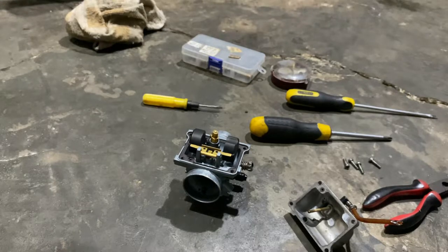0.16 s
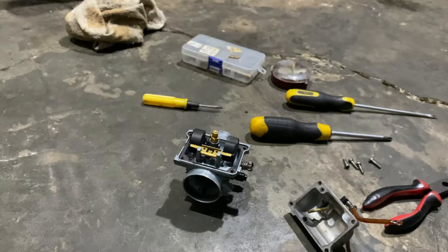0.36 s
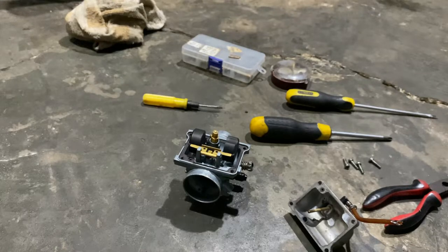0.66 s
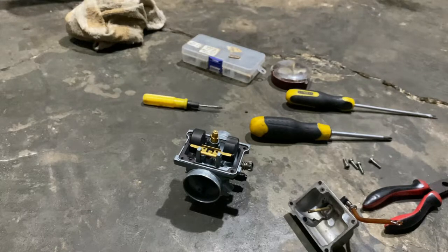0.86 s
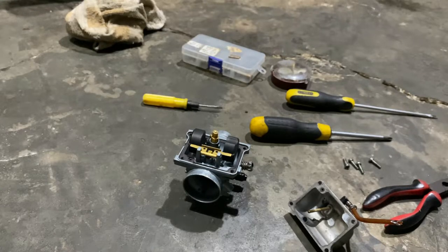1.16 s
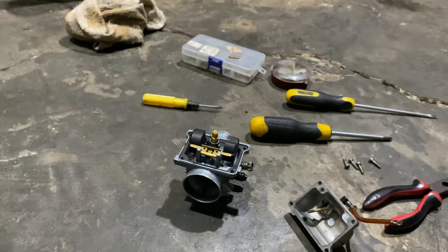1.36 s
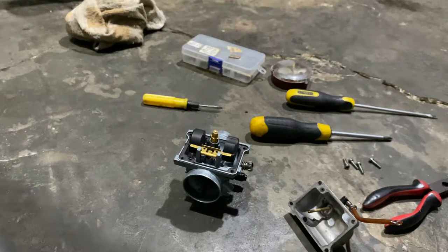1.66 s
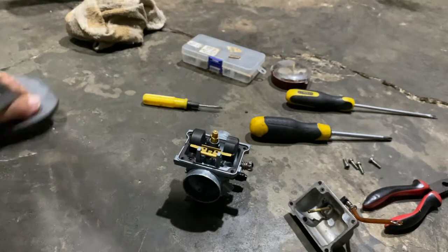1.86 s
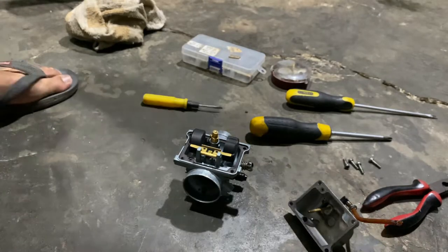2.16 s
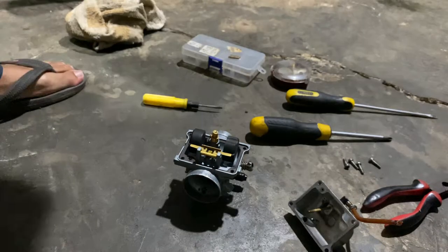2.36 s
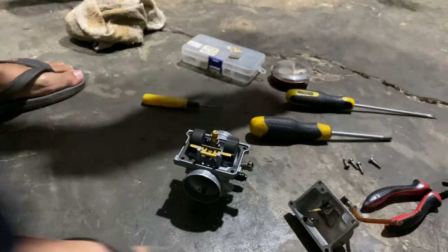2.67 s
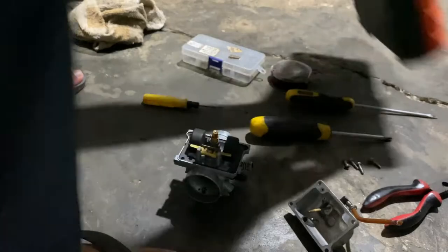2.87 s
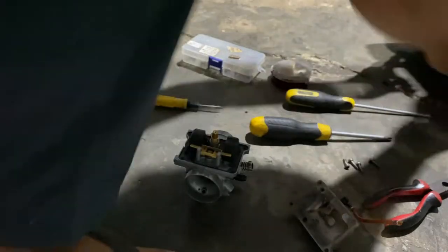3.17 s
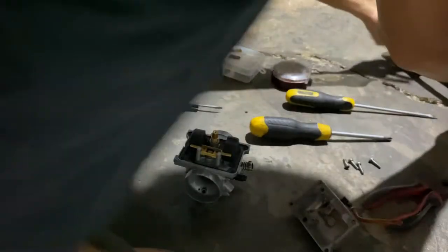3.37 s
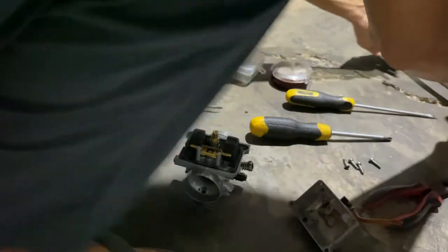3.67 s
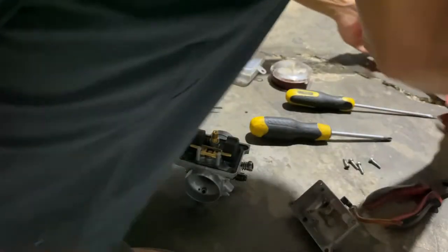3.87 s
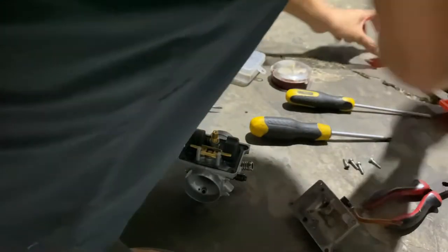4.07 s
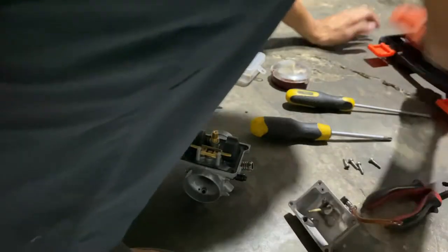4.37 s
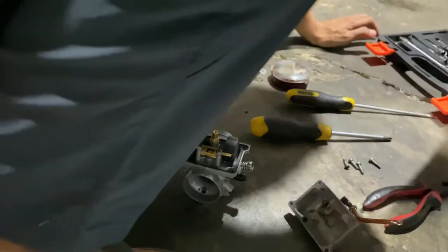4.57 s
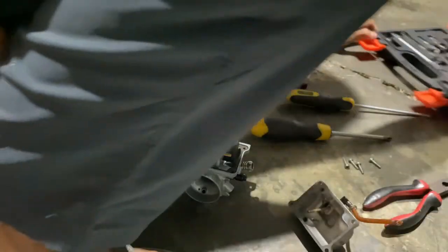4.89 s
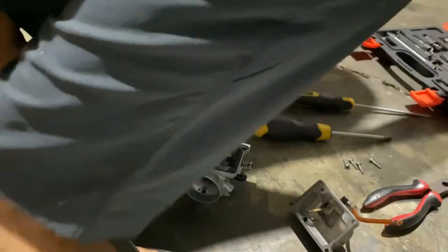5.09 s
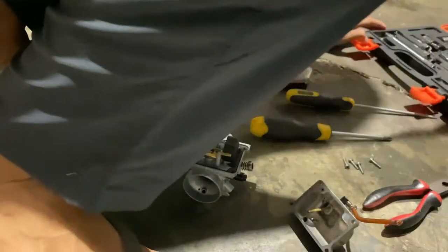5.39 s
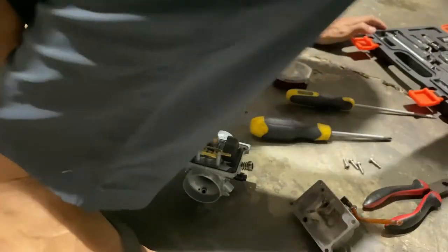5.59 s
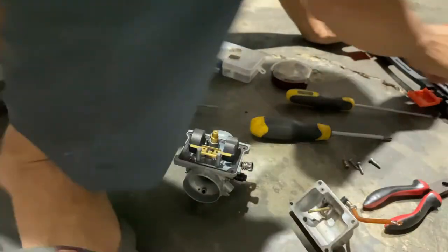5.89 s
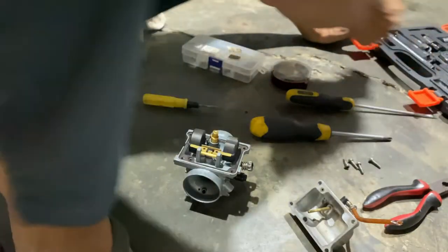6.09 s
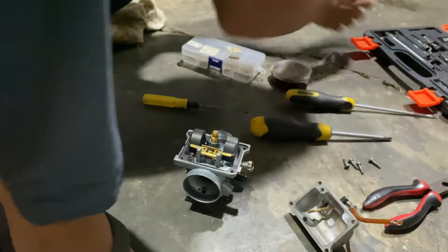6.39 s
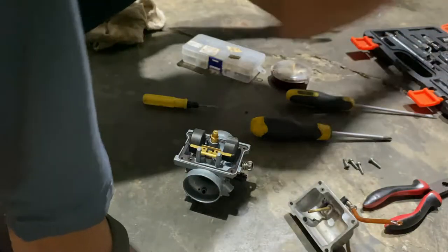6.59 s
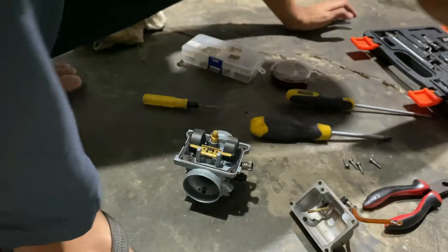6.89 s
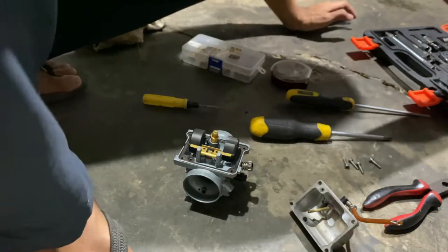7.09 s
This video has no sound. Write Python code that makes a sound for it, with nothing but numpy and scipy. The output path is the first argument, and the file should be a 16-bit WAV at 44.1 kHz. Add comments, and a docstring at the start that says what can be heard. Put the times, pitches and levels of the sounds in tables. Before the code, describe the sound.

Close up in a small, hard workshop with a low, wavering hum, clothes rustle and dry ticks crack. Sandals slap the concrete and a loaded plastic tool case lands with a boom and a rattle of tools. It bumps and scrapes over grit, a latch snaps, lighter knocks follow, then a second hard cluster of clacks and scrapes. It ends in rustling cloth, a tiny sole squeak and hum.

```python
"""In a workshop with a low hum, a loaded plastic tool case lands on a concrete floor, close to the microphone.
Blows are noise bursts with a ringing shell, then a looser rattle; landings, lid, latch and panels ring as modes.
Dragging is noise shaped by random slips, with crushed grit; sandal slaps and steel tools clack as short modes.
Someone moves nearby: cloth rustles as filtered friction, dry ticks crack and a sole squeaks on a sagging note."""
import sys
import numpy as np
from scipy import signal
from scipy.fft import rfft, irfft, next_fast_len
from scipy.io import wavfile
from scipy.ndimage import map_coordinates

SR = 44100
rng = np.random.default_rng(int(sys.argv[2]) if len(sys.argv) > 2 else 0)


def store_wav(level_fs):
    """Save 16-bit WAV to argv[1]."""
    pcm = np.round(np.clip(np.atleast_2d(level_fs), -1, 1) * 32767)
    wavfile.write(sys.argv[1], SR, pcm.T.astype(np.int16))


N = 319725
TOP_HZ = 16000  # upper band limit of the microphone
TIME = np.arange(N) / SR  # seconds through the scene
RING = np.arange(SR // 2) / SR  # seconds through one short sound

# Ringing modes of the case's shell. Each row: frequency in Hz, relative level in dB, t60 in seconds.
SHELL_MODES = [(263.6, -27.5, 0.25), (373, -29.5, 0.12), (471, -25, 0.17), (567.4, -20, 0.073),
               (703.6, -30, 0.1), (1014, -29, 0.27), (1316, -28.5, 0.13), (1476, -25.5, 0.085),
               (1740, -33, 0.085), (1900, -20, 0.1), (2245, -29.5, 0.16), (2370, -27.5, 0.08),
               (2690, -22, 0.17)]
# Colour of the struck or rubbed plastic. Each row: frequency in Hz, relative level in dB per Hz.
PLASTIC_COLOUR = [(40, -31), (90, -27), (160, 3.5), (230, -11.5), (450, -3), (750, 2.5), (1100, -5),
                  (2200, -10), (4500, -17), (6500, -19.5), (8500, -23.5), (11500, -27.5), (15500, -42)]


def amp(db):
    """Decibels to gain."""
    return 10 ** (np.asarray(db) / 20)


def unit(x):
    """Scale to rms 1."""
    return x / np.sqrt(np.mean(x ** 2) + 1e-20)


def fade(t, t60):
    """Exponential decay, 60 dB down at t60."""
    return np.exp(-np.log(1000) * t / t60)


def along(points, hz):
    """Read a curve of (Hz, value) points on a log frequency axis."""
    f, v = np.transpose(points)
    return np.interp(np.log(hz + 1), np.log(f + 1), v)


def wobble(rate):
    """A smooth random curve, rate knots a second."""
    knots = rng.standard_normal(int(N * rate / SR) + 4)
    return map_coordinates(knots, [TIME * rate])


def add(track, s, sound):
    """Mix a sound into the track from time s."""
    start = round(s * SR)
    part = sound[..., :N - start]
    track[:, start:start + part.shape[-1]] += part


def colour(x, points, band=(20, TOP_HZ), tilt=((1000, 0),)):
    """Causal filter; before the tilt, white noise of rms 1 comes out with rms 1 inside the band."""
    size = 2 * next_fast_len(x.shape[-1] // 2 + 4096)
    hz = np.fft.rfftfreq(size, 1 / SR)
    gain = amp(along(points, hz))
    in_band = (hz > band[0]) * (hz < band[1])
    gain = gain / np.sqrt(np.mean(gain ** 2 * in_band))
    gain = gain * amp(along(tilt, hz))
    # folding the cepstrum onto positive time gives the filter minimum phase
    cepstrum = irfft(np.log(gain)) * (1 + np.sign(size // 2 - np.arange(size)))
    cepstrum[0] /= 2
    response = np.exp(rfft(cepstrum))
    return irfft(rfft(x, size) * response, size)[..., :x.shape[-1]]


def ring(modes, t, scatter_db, detune=0):
    """Damped modes along two paths, each at a new strength and phase; a changing grip can shift their pitch."""
    hz, db, t60 = np.transpose(modes)[:, :, None]
    hz = hz * (1 + detune * rng.standard_normal(hz.shape))
    strength = amp(db + scatter_db * rng.standard_normal((2, len(modes), 1)))
    phase = 2 * np.pi * rng.random((2, len(modes), 1))
    return np.sum(strength * np.sin(2 * np.pi * hz * t + phase) * fade(t, t60), axis=1)


def push(modes, t, rise):
    """Damped modes set swinging from rest."""
    swing = sum(amp(db) * np.sin(2 * np.pi * hz * t) * fade(t, t60) for hz, db, t60 in modes)
    return swing * (1 - np.exp(-t / rise))


def friction(rate, spread_db, life, smooth):
    """Tiny slips of uneven size at random moments, over a smooth share of rubbing."""
    struck = rng.random(N) < rate / SR
    slips = struck * amp(spread_db * rng.standard_normal(N)) ** 2
    power = np.abs(signal.fftconvolve(slips, fade(RING, life) ** 2)[:N])
    envelope = np.sqrt(power / power.mean() + smooth)
    return unit(envelope * rng.standard_normal((2, N)))


def stroke(s, length, swell_db, attack, release):
    """A movement speeds up over a share of its length, swells or eases while it lasts, then dies away."""
    gone = np.clip((TIME - s) / length, 0, 1)
    speed = np.sin(np.pi / 2 * np.minimum(gone / attack, 1)) ** 2
    stopping = fade(np.maximum(TIME - s - length, 0), release)
    return speed * amp(swell_db * (gone - .5)) * stopping


def hum(waver_db=6.5, drift=0.74):
    """A low machine rumble of coloured noise with a few tones wavering in level and phase."""
    # Colour of the rumble. Each row: frequency in Hz, relative level in dB per Hz.
    rumble_colour = [(20, -32), (35, -5), (48, -5.5), (75, 1), (110, 5.5), (160, -4.5), (280, -18),
                     (620, -17.5), (1100, -30), (2000, -37.5), (4500, -46.5), (11000, -55.5), (15500, -69)]
    # Strength of the rumble. Each row: time in seconds, level in dB.
    rumble_levels = [(0, -38.5), (1, -41.5), (2, -44), (4, -43.5), (6, -44.5), (7.25, -43)]
    # Tones in the hum. Each row: frequency in Hz, level in dB about which it wavers.
    drone_tones = [(57, -53.5), (100, -64), (108, -57), (124, -53)]
    seconds, level_db = np.transpose(rumble_levels)
    strength = amp(np.interp(TIME, seconds, level_db))
    out = strength * colour(rng.standard_normal((2, N)), rumble_colour)
    for hz, db in drone_tones:
        level = amp(db + waver_db * wobble(3.03))
        out = out + level * np.sin(2 * np.pi * hz * TIME + drift * wobble(2.7))
    return out


def workshop(x):
    """The room's answer: a tail of noise, 10 ms behind the source, that dies sooner in the treble."""
    # Decay of the room. Each row: frequency in Hz, t60 in seconds.
    room_decay = [(100, 0.38), (500, 0.36), (2500, 0.28), (6000, 0.21), (14000, 0.15)]
    hz, t, z = signal.stft(rng.standard_normal((2, SR)), SR, nperseg=256)
    decayed = z * fade(t, along(room_decay, hz)[:, None])
    tail = signal.istft(decayed, SR, nperseg=256)[1]
    tail = np.pad(tail, ((0, 0), (SR // 100, 0)))
    return signal.fftconvolve(x, tail / np.linalg.norm(tail[0]), axes=1)[:, :N]


def clothes(level_db=-1, fold_hz=2900, stir_db=-66.5, stir_waver_db=3, release_s=0.18):
    """Fabric brushes on fabric with each movement; soft folds sound lower than taut cloth."""
    # Colour of taut cloth. Each row: frequency in Hz, relative level in dB per Hz.
    cloth_colour = [(300, -25), (1200, -9.5), (2000, -5.5), (3000, -0.5), (4500, 2), (6500, -3.5),
                    (8500, -7), (11000, -7.5), (13000, -16.5), (15500, -21)]
    # Brushes of cloth on cloth. Each row: start in seconds, length in seconds, relative rustle level in dB,
    # swell from start to end in dB, share of the length spent speeding up (0-1), share of soft folds (0-1).
    brushes = [(0.026, .2, -57.5, 2.5, 0.19, 0), (0.306, 0.056, -48.5, -12.5, 0.28, .05),
               (0.487, 0.22, -45, 9, 0.094, 0.1), (0.792, 0.18, -54.5, 8, 0.076, 0.5),
               (1.092, 0.15, -56, -16, 0.37, .25), (1.278, 0.052, -57.5, 0, 0.44, 0.4),
               (1.368, 0.021, -55, 14, 1, 0), (2.756, 0.92, -59, -1, 0.042, .05),
               (4.584, 0.31, -69, 0, 0.15, 0.9), (5.098, 0.293, -55.5, 9, 0.39, .5),
               (5.776, 0.27, -43, -22, 0.68, 0.6), (6.176, 0.037, -59, 6, .6, .55),
               (6.33, 0.07, -60, 0, 0.59, 0.6), (6.444, 0.081, -47, -9, 0.6, 0.7)]
    tight = amp(stir_db + stir_waver_db * wobble(3.82))  # cloth never lies quite still
    loose = 0
    for s, length, db, swell_db, attack, soft in brushes:
        brush = amp(db) * stroke(s, length, swell_db, attack, release_s)
        tight = tight + (1 - soft) * brush
        loose = loose + soft * brush
    fibres = friction(rate=900, spread_db=3, life=.006, smooth=1.2)
    taut = colour(fibres, cloth_colour)
    folded = colour(fibres, cloth_colour, tilt=[(1000, -1), (fold_hz, 4), (5000, -4), (11000, -1)])
    return amp(level_db) * (tight * taut + loose * folded)


def squeak(sag_hz_per_s=5000, life=0.014, rough=0.9):
    """Rubber of a sole catches on the concrete in a rough note that sags as it slows."""
    # The one squeak: start in seconds, starting frequency in Hz, level in dB.
    sole_squeak = (6.51, 2000, -55)
    s, hz, db = sole_squeak
    t = RING[:SR // 6]
    out = np.zeros((2, N))
    phase = 2 * np.pi * np.cumsum(hz - sag_hz_per_s * t) / SR + rough * wobble(400)[:len(t)]
    swell = t / life * np.exp(1 - t / life)  # peaks at life, in seconds
    add(out, s, amp(db) * swell * np.sin(phase))
    return out


def ticks(t60=0.025, level_db=2):
    """Short bright cracks of decaying noise with no body."""
    # Small dry ticks. Each row: start in seconds, relative level in dB, snap from 9 kHz up in dB.
    dry_ticks = [(.728, -31.5, 2.5), (.885, -31.5, -3.5), (0.937, -40, -4), (.969, -41.5, -16),
                 (1.951, -30.5, -23), (2.773, -28.5, -4), (3.472, -35, -8), (3.509, -38.5, -8),
                 (3.578, -29.5, -5.5), (3.729, -40.5, 7), (4.355, -50, 6.5), (4.924, -42, 8),
                 (6.099, -57, 13), (6.669, -59, 5), (6.694, -57, -6)]
    # Colour of a tick. Each row: frequency in Hz, relative level in dB per Hz.
    tick_colour = [(200, -10), (900, -0.5), (1500, -0.5), (3000, 1.5), (5000, 2), (8500, -9.5),
                   (12000, -8.5), (15500, -28)]
    out = np.zeros((2, N))
    for s, db, snap_db in dry_ticks:
        crack = rng.standard_normal((2, len(RING))) * fade(RING, t60)
        snapped = colour(crack, tick_colour, (1500, 6000), [(4000, 0), (9000, snap_db)])
        add(out, s, amp(db + level_db) * snapped)
    return out


def grains(rate, centre_hz, spread, cycles, size_db):
    """Grit crushed underneath: brief pings of scattered pitch and size, each dying over a number of cycles."""
    draw = rng.standard_normal((int(rate * N / SR), 2))
    start = rng.integers(0, N, len(draw))[:, None]
    hz = np.clip(centre_hz * np.exp(spread * draw[:, :1]), 800, 14000)
    step = np.arange(SR // 100)
    turns = hz * step / SR
    size = amp(size_db * np.clip(draw[:, 1:], -2, 2))
    pings = size * np.sin(2 * np.pi * turns) * fade(turns, cycles)
    return unit(np.bincount((start + step).ravel(), pings.ravel(), N)[:N])


def sliding(scrape_db=-4.0, hiss_db=-3, crackle_db=2, peak_db=5, width_hz=22):
    """Slips on the concrete shake the shell, while grit crackles and hisses under it."""
    # Shoves of the case over the floor. Each row: start in seconds, length in seconds,
    # relative scrape level in dB, relative grit hiss level in dB, swell from start to end in dB.
    shoves = [(2.24, 0.21, -47.5, -60, -6), (2.318, 0.032, -50, -45.5, 6.5), (2.74, 0.26, -47.5, -97, 14.5),
              (3.092, 0.033, -35, -70, -13), (3.272, 0.069, -31, -46, 6), (3.362, .12, -43.5, -47, -2.5),
              (3.683, 0.12, -49, -63, -7), (3.848, 0.27, -49.5, -79, -21), (4.345, .1, -56, -68, 3.5),
              (4.916, 0.096, -33, -39, 8), (5.183, 0.091, -37.5, -68, 2), (5.37, 0.065, -37.5, -73, 15.5),
              (5.5, 0.09, -27.5, -54.5, 2.5)]
    # Colour of the grit hiss. Each row: frequency in Hz, relative level in dB per Hz.
    grit_colour = [(1000, -44), (3000, -11), (5500, 12.5), (8500, 0), (11000, 2.5), (13000, -9),
                   (15500, -13)]
    scrape, hiss = np.zeros((2, N))
    for s, length, push_db, grit_db, swell_db in shoves:
        shove = stroke(s, length, swell_db, attack=0.22, release=0.13)
        scrape = scrape + amp(push_db) * shove
        hiss = hiss + amp(grit_db) * shove
    slips = friction(rate=300, spread_db=3.5, life=.011, smooth=.2)
    hz = np.geomspace(100, 4000, num=400)
    # the slipping noise is lifted around each mode of the shell
    resonances = sum(peak_db / (1 + ((hz - mode[0]) / width_hz) ** 2) for mode in SHELL_MODES)
    shaken = colour(slips, np.column_stack([hz, resonances]))
    body_tilt = [(150, -5.0), (350, 2), (550, 0.5), (800, 0), (3000, -6.0), (8000, -8)]
    body = colour(shaken, PLASTIC_COLOUR, (400, 1500), body_tilt)
    crackle = np.array([grains(rate=750, centre_hz=3400, spread=.42, cycles=40, size_db=4.5)
                        for path in range(2)])
    rubbed_grit = friction(rate=270, spread_db=5.5, life=0.055, smooth=0.21)
    grit = colour(rubbed_grit, grit_colour, (6500, 12500))
    # the crackle grows with both the pressure and the fine grit
    crunch = amp(crackle_db) * np.sqrt(scrape * hiss) * crackle
    return amp(scrape_db) * scrape * body + amp(hiss_db) * hiss * grit + crunch


def clacks():
    """Sandal slaps and shifting steel tools share a set of short bright modes, roughened by a fast chatter."""
    # Bright clacks: the first three a sandal slapping the floor, the rest steel tools shifting in the case.
    # Each row: start in seconds, relative level in dB.
    bright_clacks = [(1.95, -24.5), (1.956, -30.5), (2.001, -32.5), (2.149, -24.5), (2.175, -26),
                     (2.268, -39), (5.427, -32)]
    # Modes of the clacks. Each row: frequency in Hz, relative level in dB, t60 in seconds.
    clack_modes = [(3496, 0.5, 0.047), (3820, -5, 0.056), (4360, -1.5, 0.039), (4600, 3.5, 0.054),
                   (4900, -2.5, 0.046), (5060, -6, 0.04), (5360, -18, .03), (5770, -2.5, 0.055),
                   (5900, -10, 0.053), (6600, -5.5, 0.04), (7200, -9.5, 0.053), (10400, -30.5, 0.013),
                   (11700, -37, .03)]
    out = np.zeros((2, N))
    for s, db in bright_clacks:
        chatter = .6 + .8 * wobble(700)[:len(RING)]
        add(out, s, amp(db) * chatter * ring(clack_modes, RING, scatter_db=2.0))
    return out


def weight(partner_db=-4, panel_hz=150, panel_t60_s=0.23, panel_damping=0.8):
    """The loaded case booms on landing, lid and latch ring, and panels drum in clusters of close modes."""
    # The weight of the case landing. Each row: start in seconds, relative level in dB.
    landings = [(2.114, -17), (2.22, -26.5)]
    # Bumps that set the hollow lid humming. Each row: start in seconds, relative level in dB.
    lid_bumps = [(1.57, -43), (3.283, -35.5)]
    # The latch springing open. Each row: start in seconds, relative level in dB.
    latch_snaps = [(3.102, -22)]
    # Modes of the loaded case. Each row: frequency in Hz, relative level in dB, t60 in seconds.
    boom_modes = [(57.8, 3.5, 0.88), (84.5, 1.5, 0.62), (47, -8, 0.36)]
    # Modes of the lid. Each row: frequency in Hz, relative level in dB, t60 in seconds.
    lid_modes = [(283, -2, 0.83), (283, -6, 0.88), (332, -6.5, 0.57)]
    # Modes of the latch. Each row: frequency in Hz, relative level in dB, t60 in seconds.
    latch_modes = [(1026, 8.5, 0.056), (1090, 0, 0.1), (1270, -15, 0.05), (2240, 2.5, 0.056),
                   (2415, -3, 0.088), (2640, 2.5, 0.071), (3260, -4, 0.076)]
    # Hollow drumming: the first goes with a sandal slap, the rest are panels flexing.
    # Each row: start in seconds, lowest note of the cluster in Hz, relative level in dB.
    drummings = [(1.958, 700, -20.5), (2.112, 123, -15.5), (2.114, 441, -17.5), (2.155, 675, -5),
                 (2.171, 171.6, -19.5), (2.318, 180.4, -28.5), (2.57, 448, -42), (2.657, 373, -35.5),
                 (2.764, 571, -24), (2.887, 327, -32.5), (3.076, 373, -26), (3.101, 158.5, -36),
                 (3.786, 1630, -37), (3.83, 147, -25), (3.931, 112.6, -26.5), (4.039, 1186, -33),
                 (4.951, 244, -26), (4.987, 371, -22.5), (4.992, 561.5, -16.5), (5.421, 686, -20),
                 (5.504, 154.3, -26), (5.585, 160, -23.5)]
    out = np.zeros((2, N))
    for hits, modes in [(landings, boom_modes), (lid_bumps, lid_modes), (latch_snaps, latch_modes)]:
        for s, db in hits:
            add(out, s, amp(db) * push(modes, np.arange(SR) / SR, rise=0.0017))
    for s, hz, db in drummings:
        # higher notes die sooner
        t60 = panel_t60_s * (panel_hz / hz) ** panel_damping
        second = (hz * 1.09, partner_db, t60 * 1.04)
        third = (hz * 1.22, partner_db + 0.5, t60 * 0.73)
        add(out, s, amp(db) * push([(hz, 0, t60), second, third], RING, rise=1 / hz))
    return out


def plastic(x, bass_db, hard_db, crack_share=0.33):
    """The colour of a blow: hollow spots add bass, hard contacts add crack and snap."""
    crack_db = crack_share * hard_db  # part of the hardness that reaches down to 2-5 kHz
    tilt = [(280, bass_db), (520, 0), (1100, 0), (2200, crack_db), (5000, crack_db), (8000, hard_db)]
    return colour(x, PLASTIC_COLOUR, (400, 1500), tilt)


def knocks(contact=0.85, contact_t60=0.0027, shell_db=-2, fall_rise=0.0049):
    """Each blow is a contact, a dense rattle and a modal ring; a heavier one has a stronger looser rattle after it."""
    # Blows: those at 1.952 and 2.002 s are the body of sandal slaps, the others fall on the case.
    # Each row: start in seconds, relative level in dB, hollow bass in dB, hardness in dB, rise in seconds.
    blows = [(1.563, -40, 24, -1, 0.0063), (1.952, -22.5, 2, -7, 0.0036), (2.002, -26.5, 6.5, -17, 0.0019),
             (2.11, -19, 14, -21, 0.0029), (2.124, -20, 13.5, -8, 0.0027), (2.151, -15.5, 10.5, -6, .002),
             (2.177, -17.5, -4, -11, 0.0047), (2.2, -18, 2, -7.5, 0.0079), (2.267, -38, 13, 1, 0.0033),
             (2.318, -22, 6.5, -22, 0.0029), (2.459, -32.5, -2, 4.5, 0.0032),
             (2.569, -28.5, -6, -15, 0.0082), (2.656, -29, -2, -24, 0.008), (2.764, -29.5, 3.5, 3, 0.0035),
             (2.888, -37, 11, -40, 0.006), (2.98, -41.5, 11, 7, 0.0043), (3.074, -22, -7, -30, 0.0038),
             (3.1, -21.5, 3.5, 3, 0.0036), (3.279, -25.5, 6, -7, 0.0036), (3.684, -29.5, -8, -16, 0.00077),
             (3.724, -30.5, -7, 5, .0046), (3.785, -33.5, -18, -5, .001), (3.839, -26, 11, -5.5, .0012),
             (3.868, -30.5, 4, -4, 0.0041), (3.975, -32, 8, -24, 0.0047), (4.039, -26, -25, -25, 0.0016),
             (4.583, -41, 9, 0.5, 0.00091), (4.858, -35, 7.5, 0, 0.0017), (4.872, -24, -2, -3.5, 0.00093),
             (4.957, -27, -6, -6, 0.02), (4.991, -22.5, 14, 6, 0.021), (5.391, -29.5, 7, -11, .003),
             (5.419, -14.5, -1.5, -0.5, 0.0011), (5.497, -20, 2, -0.5, 0.0033),
             (5.531, -16.5, 4, -2.5, 0.00058), (5.579, -23.5, -7, -12, 0.0064)]
    rattle_t60_s = 0.06  # a buzz under every blow
    # a blow on the case throws the tools up and they fall back, later and longer
    fall_delay_s, fall_t60_s = .008, .16
    fall_db, heavy_db = -4, -15.5  # extra level of the fall under a heavy blow; level of such a blow
    fall_growth = 0.53  # extra dB of fall per dB of blow
    fall_dull_db = -5.5  # the falling tools are cushioned by their seats
    out = np.zeros((2, N))
    for s, db, bass_db, hard_db, rise in blows:
        decay = fade(RING, rattle_t60_s) + contact * fade(RING, contact_t60)
        rattle = rng.standard_normal((2, len(RING))) * decay
        shell = amp(shell_db) * ring(SHELL_MODES, RING, scatter_db=2, detune=.01)
        blow = np.minimum(RING / rise, 1) * (rattle + shell)
        add(out, s, amp(db) * plastic(blow, bass_db, hard_db))
        fall = rng.standard_normal((2, len(RING))) * np.minimum(RING / fall_rise, 1) * fade(RING, fall_t60_s)
        fall_level = amp(db + fall_db + fall_growth * (db - heavy_db))
        add(out, s + fall_delay_s, fall_level * plastic(fall, 0, hard_db + fall_dull_db))
    return out


def ports(paths):
    """The right port hears the left one's sound, shifted in phase and level, mixed with a path of its own."""
    # The two microphone ports. Each row: frequency in Hz, left lead in radians, left excess in dB,
    # coherence (0-1).
    port_differences = [(60, 0.5, 4.5, 1), (194, -0.43, 5.5, 0.91), (294, 0.5, 2, 0.85),
                        (515, 1.5, 4, 0.94), (830, 3, -2, 0.99), (1250, 4.5, 5.5, 0.66),
                        (1970, 6.5, 7.5, 0.36), (2750, 8.5, 10, 0.076), (4530, 8.5, 14.5, 0.21),
                        (6650, 5.5, 12.5, 0.22), (8470, 3, -1.5, 0.84), (9860, 1, 1, 0.78),
                        (13170, -2.5, -1, 1), (15700, -7, 5, 0.89)]
    size = next_fast_len(N + 4096)
    hz = np.fft.rfftfreq(size, 1 / SR)
    f, *cols = np.transpose(port_differences)
    lead, excess_db, alike = [np.interp(hz, f, c) for c in cols]
    left, other = rfft(paths, size)
    mixed = alike * left + np.sqrt(1 - alike ** 2) * other
    right = mixed * amp(-excess_db) * np.exp(-1j * lead)
    return irfft(np.array([left, right]), size)[:, :N]


def scene():
    """The case and the small sounds around it, in the humming room."""
    handling = knocks() + clacks() + sliding()
    small = ticks() + clothes() + squeak()
    room = workshop(amp(-10.5) * handling + amp(-14) * small)
    return ports(handling + small + weight() + room + hum())


def record(dry, low_cut_hz=36, order=4):
    """The microphone rolls off the deepest bass and keeps nothing above its band limit."""
    low_cut = signal.butter(order, low_cut_hz, "high", fs=SR, output="sos")
    thinned = signal.sosfilt(low_cut, dry)
    size = next_fast_len(N + 4096)
    kept = np.fft.rfftfreq(size, 1 / SR) < TOP_HZ
    return irfft(rfft(thinned, size) * kept, size)[:, :N]


dry = scene()
out = record(dry)
store_wav(out)
```